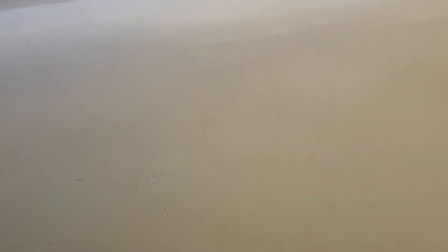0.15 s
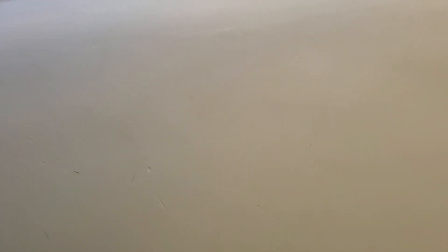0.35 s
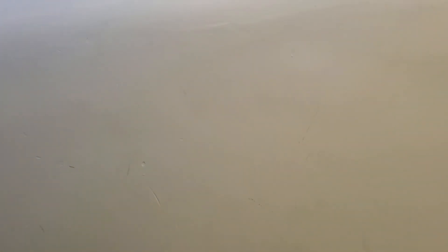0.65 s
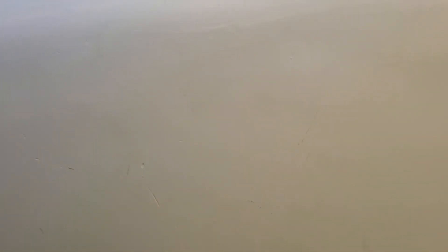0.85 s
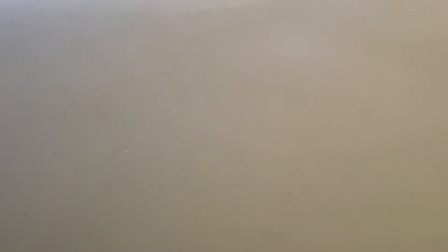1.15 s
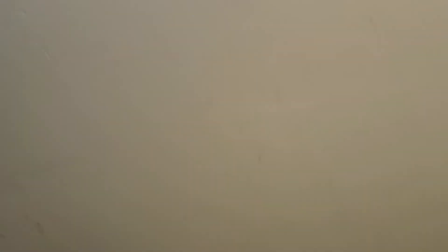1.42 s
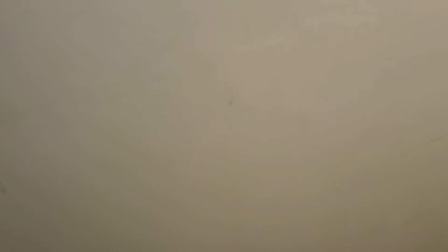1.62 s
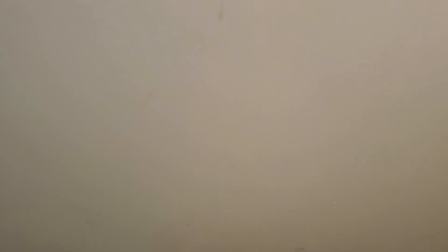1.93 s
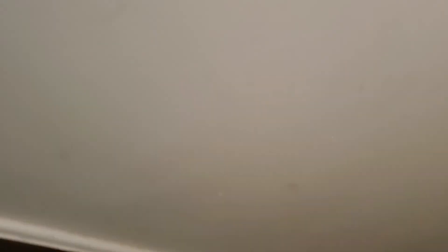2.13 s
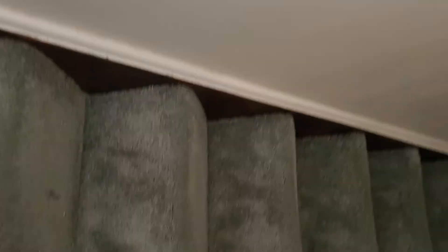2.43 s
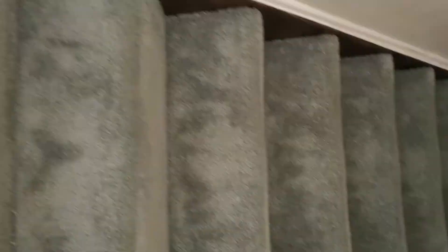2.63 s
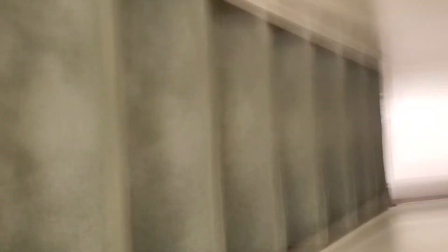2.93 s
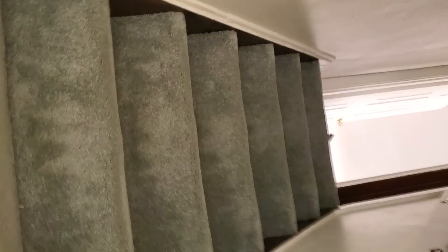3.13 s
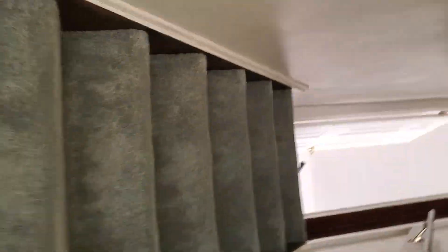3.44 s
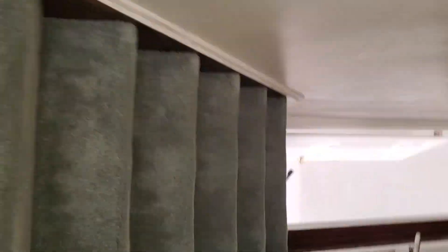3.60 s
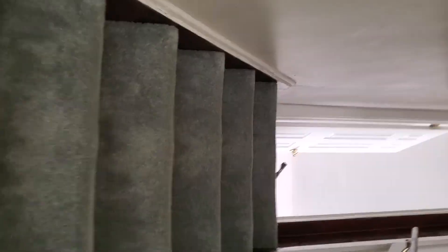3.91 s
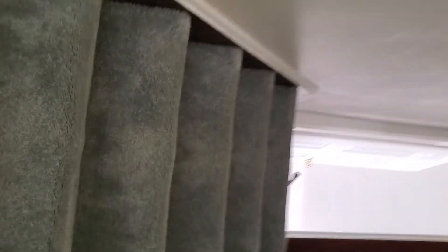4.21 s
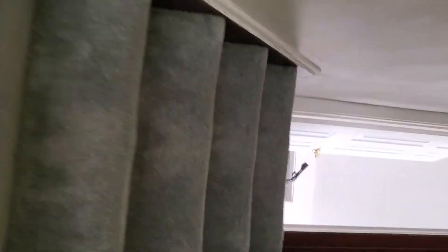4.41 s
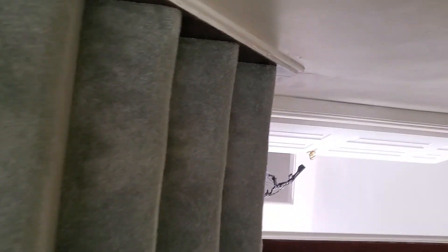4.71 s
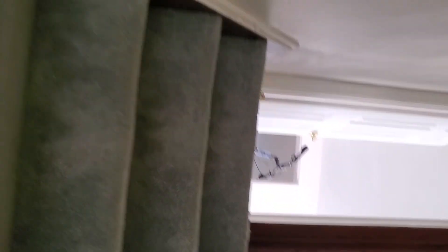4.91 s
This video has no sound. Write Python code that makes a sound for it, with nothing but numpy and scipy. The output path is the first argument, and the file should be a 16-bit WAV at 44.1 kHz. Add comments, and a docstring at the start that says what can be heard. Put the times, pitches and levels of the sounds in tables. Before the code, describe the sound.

Inside a stairwell, very quiet at first: faint low house rumble, microphone hiss and light rubbing on the camera. Rubbing grows, with barely audible thumps. Near three seconds a metal door bangs hard, close and to the left, bounces once and clatters with a short ring. Dull thumps on carpeted wooden stairs and louder grainy sliding follow, fading at the end. Hand-held stereo microphone, handling noise very near.

```python
"""A hand-held camera in a stairwell: throughout, the house rumbles faintly (low noise) under the microphone's hiss.
Cloth and fingers slide hissing over the camera (grainy noise in three bands), with now and then a fuzzy whistle
(gliding narrow noise). Feet thump on carpeted wooden stairs (short damped notes, dull scuffs and floor boom).
Near 3 s a metal door close to the left side bangs against its frame and bounces once (falling knock, noise crack,
ringing modes, clatter); thumps and sliding then go on to the end."""
import sys
import numpy as np
from scipy import signal
from scipy.fft import rfft, irfft, next_fast_len
from scipy.io import wavfile
from scipy.ndimage import uniform_filter1d, map_coordinates

SR = 44100
rng = np.random.default_rng(int(sys.argv[2]) if len(sys.argv) > 2 else 0)


def digitize_waveform(pressure):
    """Quantize a signal to 16-bit integers and store it at the path in sys.argv[1].

    Rows of a 2-D input are taken as channels; values are limited to [-1, 1].
    """
    field = np.atleast_2d(pressure).T
    bounded = np.clip(field, -1, 1)
    quanta = np.round(bounded * 32767).astype(np.int16)
    wavfile.write(sys.argv[1], SR, quanta)


N = 222969

# How alike the two ports hear house and scuffs. Each row: frequency in Hz, left-right likeness from -1 to 1.
ALIKE = [(60, 0.97), (240, 0.87), (950, -0.049), (3770, 0.7), (15000, -0.19)]


def amp(db):
    """Gain of a level in dB."""
    return 10 ** (np.asarray(db) / 20)


def unit(x):
    """x at rms 1."""
    return x / np.sqrt(np.mean(x ** 2) + 1e-20)


def along(points, hz, axis=1):
    """One column of a table read on a log-frequency axis."""
    table = np.transpose(points)
    return np.interp(np.log(hz + 1), np.log(table[0] + 1), table[axis])


def over_time(points):
    """The second column of a table whose first column is seconds, read at every sample."""
    return np.interp(np.arange(N) / SR, *np.transpose(points))


def wobble(rate):
    """A smooth random curve, rate knots a second."""
    knots = rng.standard_normal(int(N * rate / SR) + 4)
    return map_coordinates(knots, [np.arange(N) * rate / SR])


def filtered(x, response):
    """x times a response of frequency."""
    m = next_fast_len(x.shape[-1] + 8192)
    spectrum = rfft(x, m) * response(np.fft.rfftfreq(m, 1 / SR))
    return irfft(spectrum, m)[..., :x.shape[-1]]


def rush(spectrum, alike, size=N, patchy_db=0):
    """Stereo noise of rms 1: patches of random gain, a given spectrum and left-right likeness by frequency."""
    z = signal.stft(rng.standard_normal((2, size + 512)), nperseg=512)[2]
    field = rng.standard_normal(z.shape[1:])
    field = uniform_filter1d(field, size=6, axis=0)  # smooth over frequency
    field = uniform_filter1d(field, size=12, axis=1)  # smooth over time
    pair = signal.istft(z * amp(patchy_db * unit(field)), nperseg=512)[1][:, :size]

    def mid_side_gain(hz):
        turn = np.arccos(np.clip(along(alike, hz), -1, 1)) / 2
        return amp(along(spectrum, hz)) * [np.cos(turn), np.sin(turn)]

    mid, side = filtered(pair, mid_side_gain)
    return unit(np.array([mid + side, mid - side]))


def add(track, sound, s):
    """Mixes a sound into the track at s seconds."""
    part = track[:, round(s * SR):]
    part[:, :sound.shape[1]] += sound[:, :part.shape[1]]


def ring(t, hz, db, t60, attack):
    """A damped mode with a soft start; t60 and attack in seconds."""
    return amp(db - 60 * t / t60) * np.sin(2 * np.pi * hz * t) * (1 - np.exp(-t / attack))


def dying(noise, table, axis):
    """Noise whose every frequency dies with its own t60."""
    hz, t, z = signal.stft(noise, SR, nperseg=256)
    decay = amp(-60 * t / along(table, hz, axis)[:, None])
    return signal.istft(z * decay, SR, nperseg=256)[1][:, :noise.shape[1]]


def door():
    """Each blow: a knock falling in pitch, a crack, ringing modes and a clatter dying band by band."""
    # The bang and its bounce. Each row: start in seconds, knock level in dB, knock cycles in the first ms,
    # pitch steadiness 0-1, knock t60 in seconds, crack level in dB, gain of the ringing modes in dB,
    # clatter level in dB, clack frequency in Hz, clack level in dB.
    blows = [(2.9504, -3, 0.81, 0.43, 0.082, -7.5, -23.5, -18.5, 2500, -16.5),
             (3.0397, 0, 0.38, 0.94, 0.021, -6, -27, -19.5, 3700, -13)]
    # Colour of the crack. Each row: frequency in Hz, relative level in dB per Hz.
    crack_colour = [(300, -6), (1000, -25), (2500, -0.5), (4000, -5), (5500, -6.5), (9000, -2),
                    (12000, -10), (15500, -2)]
    # Dense small modes of the sheet. Each row: frequency in Hz, relative level in dB per Hz, t60 in seconds.
    sheet = [(103, 12, 0.47), (312, 4, 0.47), (800, 3.5, 0.51), (2060, -8, 0.96), (3400, 0.5, 0.13),
             (4930, -10, 0.35), (6250, -2.5, 0.17), (6630, 3.5, 0.45), (8950, 6.5, 0.12),
             (11900, -0.5, 0.31), (15500, -23, .1)]
    out, t = np.zeros((2, N)), np.arange(SR // 2) / SR
    swell = 1 - np.exp(-t / 0.0036)
    for k, blow in enumerate(blows):
        s, db, cycles, steady, t60, crack_db, ring_db, clatter_db, clack_hz, clack_db = blow
        turns = cycles * (t * 1000) ** steady  # fast bending waves arrive first
        knock = -amp(db - 60 * t / t60) * np.sin(2 * np.pi * turns)
        knock -= ring(t, 1160, db - 1, 0.0077, attack=0.00018)
        crack = amp(crack_db - 60 * t / 0.0091) * rush(crack_colour, [(500, .6), (4000, 0.13)], size=len(t))
        crack += ring(t, clack_hz, clack_db, 0.0095, attack=0.00027)  # the latch tongue snaps on its plate
        clatter = rush(sheet, [(100, 0.71), (1000, 0.0), (5000, 0.0)], size=len(t))
        clatter = dying(clatter, sheet, axis=2)
        after = swell * (amp(ring_db) * leaf(t, k) + amp(clatter_db) * clatter)
        add(out, knock * amp([[0], [-17]]) + crack + after, s)  # knock 17 dB weaker on the right
    return out


def leaf(t, blow):
    """The ringing modes of leaf and latch after a blow; high ones flutter and differ more between the ports."""
    # Modes of the door leaf, in Hz.
    leaf_hz = [301, 490, 609, 741, 834, 1034, 1174, 1395, 1567, 1782, 1945, 2360]
    # Modes of the latch, in Hz.
    latch_hz = [3198, 6696, 7120, 7565, 8397, 8686, 8732, 9170, 9410, 10800, 11180]
    # How leaf modes, then latch modes, ring. Each row: relative level at first blow in dB, at second blow in dB,
    # t60 in seconds, left-right difference in dB.
    mode_rows = [(-10, -5.5, 0.29, 8), (-13, -15, 0.79, 6), (-6, -32, 0.31, 6), (-5.5, -7, 0.28, -1),
                 (-13.5, -11.5, 0.88, 1.5), (-10.5, -33, 0.6, -2), (-0.5, -15, 0.15, -1),
                 (-32, -2.5, 0.37, -4), (-22, -19, 1, -17), (-24, -14, 0.49, -12), (-9, -17, 0.58, -4),
                 (-43, -18, 0.98, -10), (-9, -3, 0.18, -11.5), (-20, -8, 0.36, -16), (-18, -17, 0.36, -11),
                 (-16, -19, 0.21, 0), (-6, -20, 0.23, -10), (3, -6, 0.2, 6), (-5, 3.5, 0.16, -6),
                 (-14, -16, 0.17, -2), (-6, -20, 0.34, -9), (-12, -21, .12, 3), (-19, -21, .12, 0)]
    modes = 0
    for hz, (*level_db, decay, pan_db) in zip([*leaf_hz, *latch_hz], mode_rows):
        rattle = hz / (hz + 4000)
        flutter = np.interp(t, np.arange(41) / 80, rng.normal(0, 4, 41)) * rattle  # in dB, 80 knots a second
        start = rng.random() + rattle * rng.normal(0, .2, (2, 1))  # phase at each port, in turns
        gain = amp(level_db[blow] - 60 * t / decay + flutter + [[pan_db / 2], [-pan_db / 2]])
        modes += gain * np.sin(2 * np.pi * (hz * t + start))
    return modes


def thumps():
    """Each soft contact: a short woody note and a dull scuff, answered by the walls, and the boom of the stair floor."""
    # Contacts on stairs and frame. Each row: start in seconds, note level midway between the ports in dB,
    # pitch in Hz, note t60 in seconds, gain of the floor boom in dB.
    contacts = [(1.342, -41.5, 607, 0.076, -60), (1.675, -47.5, 730, 0.046, -62),
                (1.795, -47, 480, .06, -64), (2.078, -39.5, 94, 0.29, -54),
                (2.722, -28.5, 143, 0.031, -34.5), (2.912, -27, 170, 0.039, -64),
                (2.952, -22, 118, 0.25, -18), (3.042, -25.5, 113.5, 0.31, -30),
                (3.105, -18, 364, 0.046, -23), (3.13, -24.5, 302, 0.057, -29), (3.15, -24, 228, 0.053, -24),
                (3.176, -34, 127, 0.073, -28.5), (3.414, -33, 328, 0.043, -41),
                (3.531, -32.5, 206, 0.082, -45), (3.545, -33.5, 390, 0.065, -42),
                (3.631, -35, 94, 0.11, -41.5), (3.778, -32.5, 169.4, 0.14, -52),
                (4.065, -35.5, 504, 0.065, -25), (4.0873, -26.5, 112, 0.13, -25),
                (4.135, -37.5, 143.5, 0.25, -41), (4.244, -43.5, 234, 0.13, -68),
                (4.29, -30, 216, 0.07, -42), (4.655, -20.5, 204, 0.066, -28.5),
                (4.691, -17, 237, 0.053, -31), (4.71, -18.5, 184, 0.031, -39), (4.728, -31, 574, 0.09, -45),
                (4.745, -29, 488, 0.052, -42), (4.762, -30, 255, 0.074, -63),
                (4.772, -47, 540, 0.091, -28.5), (4.931, -42, 553, 0.16, -63), (4.971, -48, 708, 0.23, -52)]
    # Modes of the stair floor. Each row: frequency in Hz, relative level in dB, t60 in seconds.
    floor_modes = [(62.3, 3, 0.56), (97, -2.5, 0.21), (120.9, -11.5, 0.47)]
    # Scuff colour of a 300 Hz contact. Each row: frequency in Hz, relative level in dB per Hz.
    scuff_colour = [(60, -0.5), (150, -2), (350, -6), (700, -11.5), (1500, -17.5), (3000, -28), (8000, -65)]
    scuff_at_300_db, scuff_grows = -35, 0.7  # scuff of a -30 dB thump at 300 Hz; dB gained per dB of the thump
    scuff_per_octave_db = 1.5  # higher contacts scuff more
    near, floor, t = np.zeros((2, N)), np.zeros((2, N)), np.arange(SR * 3 // 4) / SR
    for s, db, hz, t60, boom_db in contacts:
        note = ring(t, hz, db, t60, attack=0.0025)
        scuff_db = scuff_at_300_db + scuff_grows * (db + 30) + scuff_per_octave_db * np.log2(hz / 300)
        colour = np.multiply(scuff_colour, [(hz / 300) ** 0.47, 1])  # harder contacts ring higher and scuff brighter
        scuff_shape = amp(scuff_db - 60 * t / 0.11) * (1 - np.exp(-t / 0.0024))
        scuff = scuff_shape * rush(colour, ALIKE, size=len(t))
        boom = sum(ring(t, f, boom_db + level, decay, attack=0.027) for f, level, decay in floor_modes)
        add(near, (note + scuff) * amp([[1.1], [-1.1]]), s)  # slightly to the left
        add(floor, boom * amp([[.6], [-.6]]), s)
    return near + amp(-3.0) * stairwell(near) + floor


def stairwell(x):
    """The walls answer after a few milliseconds with a noise tail, differently at each port."""
    # Decay of the stairwell. Each row: frequency in Hz, t60 in seconds.
    wall_decay = [(100, 0.4), (400, 0.24), (2000, 0.42), (10000, 0.37)]
    tail = dying(rush([(100, 0)], [(100, 0.76), (700, 0.71)], size=SR // 2), wall_decay, axis=1)
    delayed = np.pad(x.mean(0), (300, 0))[None]  # 300 samples on the way to the walls
    return signal.fftconvolve(delayed, tail / np.linalg.norm(tail[0]), axes=1)[:, :N]


def rubbing():
    """Sliding skin and cloth hiss differently at each port; tiny snags make it grainy, a dull drag lies below."""
    # Sliding on the camera body. Each row: time in seconds, fine hiss in dB before its fixed lift.
    sliding = [(0.0, -65), (0.12, -73), (0.27, -76), (0.83, -81), (0.98, -64), (1.19, -54), (1.31, -57),
               (1.35, -54), (1.47, -57), (1.54, -53), (1.62, -56), (1.72, -45.5), (1.99, -43), (2.06, -45),
               (2.11, -56.5), (2.27, -57), (2.37, -46), (2.47, -47.5), (2.52, -53), (2.58, -47.5),
               (2.84, -45), (2.9, -39), (3.22, -38.5), (3.4, -39.5), (3.556, -38), (3.596, -43),
               (3.638, -39.5), (3.762, -47), (3.95, -40.5), (4.2, -36), (4.48, -38), (4.542, -37.5),
               (4.68, -46.5), (4.78, -49), (4.954, -56.5), (5.056, -54.5)]
    # Coarse hiss against the fine one at rest. Each row: time in seconds, offset in dB before its fixed lift.
    coarse_over = [(0, -7), (.85, -7), (1.0, -7), (1.5, 0.5), (2.0, 1), (2.45, -1), (2.8, 1.5), (3.4, 0.5),
                   (3.9, -1), (4.2, -3.5), (4.55, -4), (4.7, 1.5), (5.05, -2)]
    # Side of the fine hiss before the port lift. Each row: time in seconds, left-right difference in dB.
    fine_pan = [(0, 4), (.8, -5), (1.0, 7), (1.5, 3.5), (2.1, 1.7), (2.5, 5), (3.2, 1.7), (5.06, 2.5)]
    # Colours of fine hiss, coarse hiss and drag. Each row: frequency in Hz, relative level in dB per Hz.
    fine_colour = [(3000, -33.5), (5000, -9), (6700, -4), (7600, -6), (9700, -4), (12400, -3), (15100, 0.5),
                   (16000, -6)]
    coarse_colour = [(500, -53), (1200, -8.5), (1900, -4), (3150, -0.5), (4300, -3.5), (6000, -11.5),
                     (9000, -29.5)]
    drag_colour = [(150, -15), (400, 1), (900, 2.5), (1400, 1), (2000, -1.5), (4000, -38)]
    # The right port lies nearer the fingers. Each row: frequency in Hz, lift of right over left in dB.
    right_port = [(2000, 23), (8000, 1.5), (15000, 7)]
    coarse_follows, rest_db = 0.7, -53  # the coarse hiss takes only a share of the swings of the fine hiss
    drag_under_db, drag_top_db = -2, -52  # drag against the coarse hiss, and its ceiling before it yields
    drag_yields = 0.88  # dB lost by the drag for each dB that the fine hiss stands over the coarse one
    fine_lift_db, coarse_lift_db = 4.0, 3.5

    fine_db, over_db, pan_db = over_time(sliding), over_time(coarse_over), over_time(fine_pan)
    coarse_db = rest_db + coarse_follows * (fine_db - rest_db) + over_db
    drag_db = np.minimum(coarse_db + drag_under_db, drag_top_db) - drag_yields * (fine_db - coarse_db)
    snags = amp(1.17 * np.array([wobble(900), wobble(830)]))  # one curve for each port
    fine = unit(snags * rush(fine_colour, [(5000, 0.0079)], patchy_db=-0.54)) * amp(fine_lift_db)
    fine = filtered(fine, lambda hz: amp(np.outer([-.5, .5], along(right_port, hz))))
    fine = fine * amp(fine_db + np.outer([.5, -.5], pan_db))
    coarse = rush(coarse_colour, [(1500, -0.15)], patchy_db=1.77) * amp(coarse_lift_db + coarse_db)
    drag = rush(drag_colour, [(300, 1.0), (1500, 0.081)], patchy_db=2.5) * amp(drag_db)
    return fine + coarse + drag


def whistles():
    """Narrow noise that glides as the hollow of the hand changes."""
    # Fuzzy whistles in the sliding. Each row: start in seconds, length in seconds, first frequency in Hz,
    # last frequency in Hz, half-width in Hz, level at the middle in dB.
    glides = [(0.822, 0.3, 3910, 3590, 75.4, -61), (.9, 0.19, 2880, 2890, 120, -71),
              (1.287, 0.18, 4050, 3910, 101, -58), (2.282, 0.59, 1421, 1405, 70, -55.5),
              (3.407, 0.14, 1292, 2503, 103, -44), (3.924, 0.136, 1790, 1900, 49.3, -45),
              (4.06, 0.063, 1954, 2560, 80, -59), (4.738, 0.25, 1412, 1386, 70, -56)]
    out = np.zeros((2, N))
    for s, length, first_hz, last_hz, width_hz, db in glides:
        u = np.arange(round(length * SR)) / (length * SR)  # 0 to 1 through the whistle
        angle = 2 * np.pi * np.cumsum(first_hz + (last_hz - first_hz) * u) / SR
        slow = filtered(rng.standard_normal((2, 2, SR)), lambda hz: 1 / (1 + (hz / width_hz) ** 2))
        a, b = unit(slow)[..., :len(u)]
        fuzzy = a * np.cos(angle) + b * np.sin(angle)
        add(out, amp(db) * np.sin(np.pi * u) ** 0.45 * fuzzy, s)
    return out


def house():
    """Low rumble of the building, wavering in level, over the microphone's own hiss."""
    # The building. Each row: time in seconds, level in dB before the waver.
    rumble = [(0.0, -52), (1.0, -51.5), (1.15, -47.5), (1.65, -51.5), (1.92, -45.5), (2.322, -48.5),
              (2.82, -47), (3.11, -31.5), (3.32, -47.5), (3.95, -48.5), (4.22, -44.5), (4.8, -53),
              (4.96, -46.5)]
    # Colours of the building and of the microphone's own noise. Each row: frequency in Hz,
    # relative level in dB per Hz.
    house_colour = [(15, -43), (28, -6.5), (45, -6), (85, -4), (125, -21.5), (165, -23), (270, -26.5),
                    (700, -30.5), (1130, -41.5), (2300, -56), (16000, -92)]
    hiss_colour = [(1000, 0.5), (2300, -7), (4500, 7.5), (8000, 2), (16000, -5)]
    hiss = amp(-68.5) * rush(hiss_colour, [(1000, 0)])  # unlike at the two ports
    level_db = over_time(rumble) + 1.23 * wobble(7)
    return amp(level_db) * rush(house_colour, ALIKE, patchy_db=0.56) + hiss


def scene():
    """Everything at the two microphone ports."""
    return door() + thumps() + rubbing() + whistles() + house()


def record(dry):
    """The microphone loses the deepest bass, peaks round off, nothing is kept above the band limit."""
    bass_hz, ceiling, top_hz = 28, .9, 15950
    thin = filtered(dry, lambda hz: (1j * hz / (bass_hz + 1j * hz)) ** 2)
    soft = thin / (1 + np.abs(thin / ceiling) ** 6) ** (1 / 6)
    return filtered(soft, lambda hz: hz < top_hz)


dry = scene()
out = record(dry)
digitize_waveform(out)
```